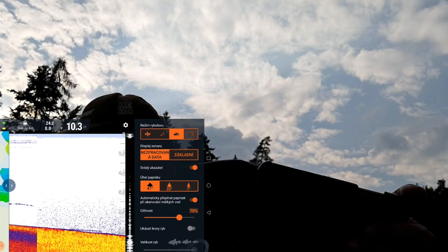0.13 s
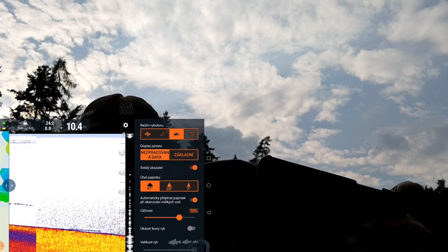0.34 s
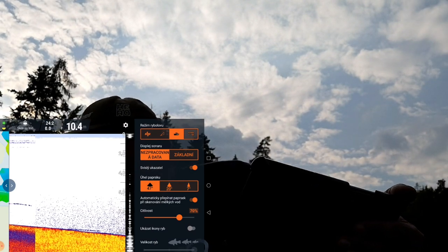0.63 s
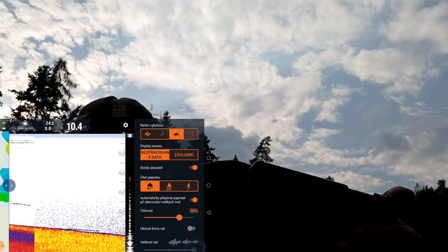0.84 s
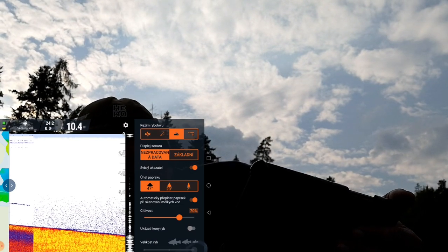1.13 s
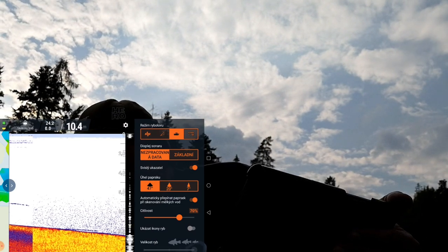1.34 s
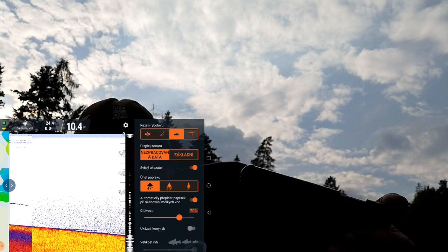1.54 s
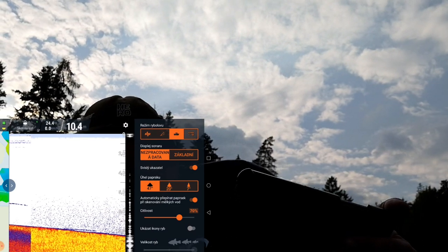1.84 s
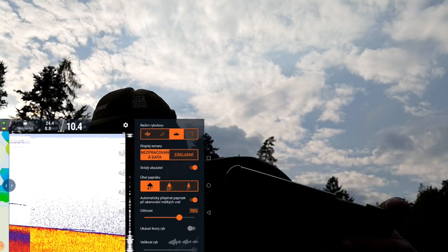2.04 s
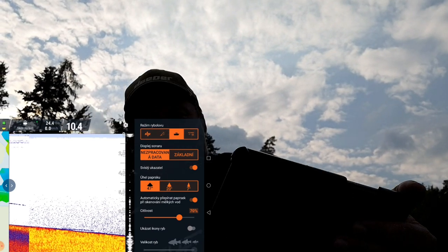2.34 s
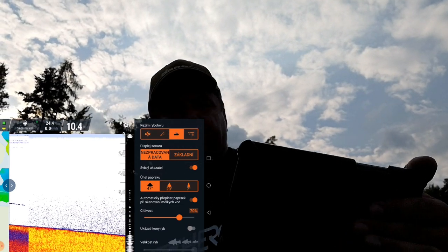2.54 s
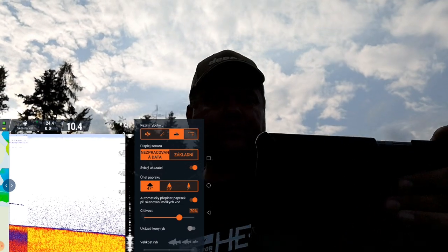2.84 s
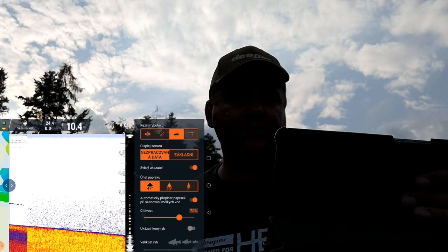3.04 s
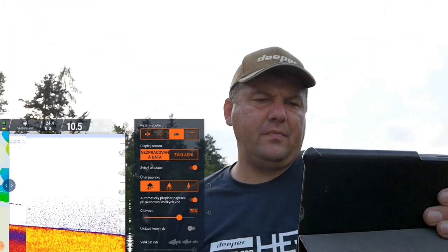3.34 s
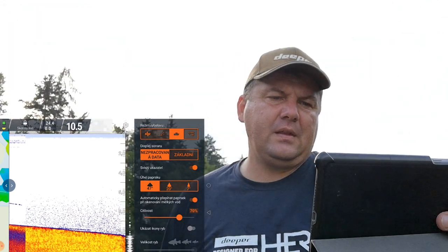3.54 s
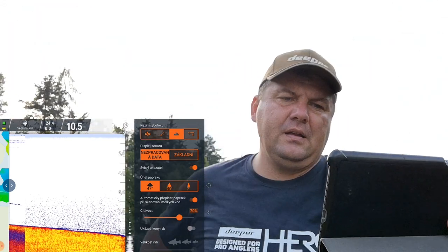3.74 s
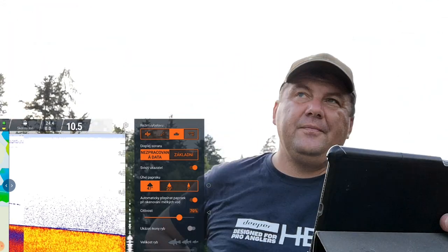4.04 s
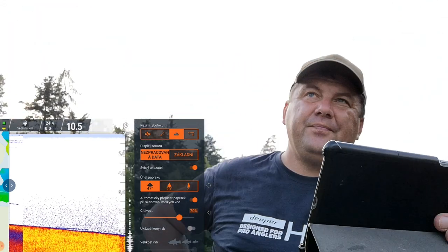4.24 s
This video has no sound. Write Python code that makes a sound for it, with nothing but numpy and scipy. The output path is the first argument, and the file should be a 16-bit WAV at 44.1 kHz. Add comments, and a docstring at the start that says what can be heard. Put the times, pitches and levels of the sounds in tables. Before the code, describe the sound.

Close by a small boat on a quiet lake, a wooden clonk strikes the water three times, about 0.7 seconds apart. Each gives a deep popping boom with a rising gulp, light splash, glugs and droplets. A loud hard knock on the deck follows, then a cluster of duller knocks and a short cloth rustle. Faint outdoor air; close stereo microphone on the boat.

```python
"""Three clonk strokes in a lake beside a boat

A wooden clonk is driven three times into the water: an air pocket booms as a falling sine, its neck pinches off
with a rising gulp, and left-over air glugs. Splashes, spray and plops are band noise; bubbles are gliding sines.
Noise through hull resonances surges after each stroke. Then knocks ring the deck and cloth rustles in the boat.
A two-port microphone sets the phase and level between left and right.
"""
import sys
import numpy as np
from scipy import signal
from scipy.fft import rfft, irfft, next_fast_len
from scipy.io import wavfile
from scipy.ndimage import uniform_filter1d

SR = 44100
rng = np.random.default_rng(int(sys.argv[2]) if len(sys.argv) > 2 else 0)


def master_out(mix):
    """Clip the mix to full scale and print it as 16-bit PCM to the path in sys.argv[1]."""
    frames = np.transpose(np.atleast_2d(mix))
    ceiling = np.clip(frames, -1, 1)
    pcm = np.round(ceiling * 32767).astype(np.int16)
    wavfile.write(sys.argv[1], SR, pcm)


N = 193863
T = np.arange(N) / SR
BANDS_HZ = 125 * 2 ** np.arange(0, 7, 1 / 3)  # third-octave centres
OPPOSITE = np.array([[1], [-1]])  # left up, right down

# timing of each stroke: blow_s, neck_closes_s, gulp_hz, gulp_length_s
STROKES = [(0.4156, .4460, 294, .027), (1.1164, 1.1545, 286.5, .033), (1.8277, 1.8645, 295, .025)]
# strength of each stroke: pocket_db, pocket_t60_s, neck_db, gulp_db, slap_db, slap_t60_s, spray_db, fall_back_db
STRENGTHS = [(-4, 0.71, -9, -7, -29, 0.18, -45.5, -50), (-3, 0.208, -16, -17, -28.5, 0.14, -46.5, -53.5),
             (-3, 0.3, -10, -11.5, -28, 0.1, -46, -48.5)]
EARLIER_STROKE_S = -.3  # its water is still settling
# knocks in the boat: start_s, level_db, tilt_db_per_octave, t60_s, thud_db, thud_hz, thud_width_octaves
KNOCKS = [(2.7200, -16, 0, 0.19, -43, 390, 0.13), (3.349, -29.5, -2, 0.13, -29, 260, 1),
          (3.454, -52, -9.5, 0.22, -46, 257, .5), (3.556, -24.5, -1.5, 0.12, -31.5, 373, .29),
          (3.6, -32.5, -1.5, 0.19, -30.5, 256, 0.93), (3.661, -29, -6.5, 0.082, -31.5, 630, 0.43),
          (3.664, -40, 0.5, 0.16, -41.5, 1450, 0.22), (3.694, -57.5, 7, 0.082, -58, 250, .56),
          (3.7760, -62.5, 11.5, 0.045, -63, 3600, .15), (3.798, -63, 4.5, 0.45, -68, 3750, 0.17)]


def undb(db):
    """Amplitude of a level in dB."""
    return 10 ** (np.asarray(db) / 20)


def unit(x):
    """Scale to an RMS of 1."""
    return x / np.sqrt(np.mean(x ** 2))


def band(x, hz, width):
    """Four-pole band-pass, width in Hz."""
    return signal.sosfilt(signal.butter(2, [hz - width / 2, hz + width / 2], "band", fs=SR, output="sos"), x)


def walk(rate):
    """Random levels, each held 1 / rate s, then smoothed into ramps."""
    hold = int(SR / rate)
    steps = np.repeat(rng.standard_normal(N // hold + 1), hold)
    return 0.47 * uniform_filter1d(steps, hold)[:N]


def shares(spectrum):
    """Power of each third-octave band, summing to 1, from a spectrum in dB per Hz."""
    hz, db = np.transpose(spectrum)
    density_db = np.interp(np.log(BANDS_HZ), np.log(hz), db, left=-90)
    power = undb(2 * density_db) * BANDS_HZ
    return power / power.sum()


def add(out, s, piece):
    """Mix a piece in at time s."""
    i = int(s * SR)
    out[..., i:i + piece.shape[-1]] += piece[..., :N - i]


def bubble(hz, length, start=0.81, glide_s=.005, skew=0.79):
    """A swelling and fading sine whose pitch slides from start * hz towards hz."""
    t = np.arange(int(length * SR)) / SR
    pitch = hz * (1 + (start - 1) * np.exp(-t / glide_s))
    swell = np.sin(np.pi * (t / length) ** skew)
    return swell * np.sin(2 * np.pi * np.cumsum(pitch) / SR)


def bursts(events, spectrum, damping):
    """Band power of broad noise bursts; t60 holds at 2 kHz and is shorter in the treble."""
    power, t = np.zeros((len(BANDS_HZ), N)), T[:SR // 2]
    octaves = np.log2(BANDS_HZ / 2000)[:, None]
    colour = shares(spectrum)[:, None]
    for s, db, tilt_db, t60, rise_s in events:
        fall = np.exp(-2 * np.log(1000) * t / (t60 * 2 ** (-damping * octaves)))
        rise = (1 - np.exp(-t / rise_s)) ** 2
        add(power, s, colour * undb(2 * (db + tilt_db * octaves)) * fall * rise)
    return power


def patches(events):
    """Band power of short noise patches, each a bell-shaped spectrum around its pitch."""
    power, t = np.zeros((len(BANDS_HZ), N)), T[:SR // 5]
    rise = (1 - np.exp(-t / .0018)) ** 2
    for s, db, hz, width, t60 in events:
        colour = np.exp(-(np.log2(BANDS_HZ / hz) / width) ** 2)
        colour = (colour / colour.sum())[:, None]
        add(power, s, colour * undb(2 * (db - 60 * t / t60)) * rise)
    return power


def hiss(power, alike, grain_db, grain_rate):
    """Band noise under power curves, with a grainy level; alike is the power share common to both ports."""
    out, grain = 0, undb(grain_db * walk(grain_rate))
    for hz, p in zip(BANDS_HZ, power):
        mid, side = unit(band(rng.standard_normal((2, N)), hz, hz / 4))
        pair = np.sqrt(alike) * mid + np.sqrt(1 - alike) * side * OPPOSITE
        out = out + np.sqrt(p) * pair
    return out * grain


def clonk():
    """The pocket rings from the blow; its neck throbs as it closes and the smaller bubble left behind gulps."""
    pocket_hz, neck_hz = 81.8, 177
    rebound_db, rebound_hz, rebound_s = -18, 70.5, .045
    out, t = np.zeros(N), T[:SR // 4]
    pitch = pocket_hz * (1 + 1.58 * np.exp(-t / 0.0032))  # falls onto the pocket's pitch
    tone = np.sin(2 * np.pi * np.cumsum(pitch) / SR)
    attack = 1 - np.exp(-(t / 0.0043) ** 2)
    for (s, pinch, gulp_hz, gulp_s), (db, t60, neck_db, gulp_db, *_) in zip(STROKES, STRENGTHS):
        closing = 1 / (1 + np.exp((t + s - pinch - .005) / .0025))  # fades the pocket as the neck shuts
        add(out, s, undb(db - 60 * t / t60) * attack * closing * tone)
        neck = bubble(neck_hz, .022, start=.75, glide_s=.004, skew=.75)
        add(out, pinch - .003, undb(neck_db) * neck)
        gulp = bubble(gulp_hz, gulp_s, start=.8, glide_s=.004, skew=.6)
        add(out, pinch + .002, undb(gulp_db) * gulp)
        # the pocket rebounds once as its neck closes
        add(out, pinch + .006, undb(rebound_db) * bubble(rebound_hz, rebound_s))
    return out


def smacks():
    """The blade smacks the surface: short steady sines just after each blow."""
    # start_after_blow_s, level_db relative to the slap, pitch_hz, length_s
    smack_table = [(.0024, 3, 2890, .0055), (.0028, -3.5, 3630, .006), (.003, -13, 1430, .01),
                   (.008, -1, 2830, .006)]
    out = np.zeros(N)
    for (s, *_), (_, _, _, _, slap_db, *_) in zip(STROKES, STRENGTHS):
        for late, db, hz, length in smack_table:
            add(out, s + late, undb(slap_db + db) * bubble(hz, length, start=1.0))
    return out


def glugs():
    """Air left under water glugs: low bubbles of 2.8 nominal cycles, rising in pitch."""
    # start_s, peak_db, pitch_hz
    glug_table = [(0.0, -29.5, 77.3), (0.519, -20, 91.6), (0.551, -19.5, 92.3), (.578, -20, 92.4),
                  (0.606, -26.5, 69), (0.705, -30.5, 71.5), (0.746, -40.5, 66.5), (1.214, -22, 87.5),
                  (1.264, -20.5, 92), (1.285, -27, 91.4), (1.313, -33.5, 77.8), (1.393, -34, 83),
                  (1.432, -40.5, 66), (1.934, -20.5, 97), (1.963, -20.5, 90.2), (2.022, -23.5, 75),
                  (2.066, -29, 81), (2.088, -32, 73.6), (2.115, -31.5, 66), (2.223, -43, 92)]
    out = np.zeros(N)
    for s, db, hz in glug_table:
        add(out, s, undb(db) * bubble(hz, 2.8 / hz))
    return out


def water():
    """Band power of each slap, the spray thrown as the neck closes, its fall back, lone splashes and plops."""
    # lone splashes: start_s, level_db, tilt_db_per_octave, t60_s
    splashes = [(.600, -42.5, -7, 0.12), (1.204, -57.5, 7, 0.15), (1.290, -60.5, 0.5, 0.27),
                (1.800, -45, -11, 0.076)]
    # plops of falling water: start_s, level_db, pitch_hz
    plops = [(0.109, -58.5, 693), (0.162, -52.5, 2400), (0.184, -54, 2830), (0.218, -57.5, 3120),
             (.520, -49.5, 1390), (.594, -47, 3420), (0.62, -46, 2050), (.652, -57, 1230),
             (0.747, -47.5, 3230), (0.759, -45.5, 2290), (.762, -58, 880), (0.822, -57, 2110),
             (0.861, -60, 1310), (.682, -58.5, 1950), (1.241, -54, 1370), (1.950, -60, 2000),
             (2.068, -57.5, 2730), (2.271, -55, 2130), (1.328, -56, 3300), (1.495, -53, 2720),
             (1.572, -61, 2250), (1.930, -50, 784), (2.005, -60, 3800), (2.048, -45, 916),
             (2.052, -51.5, 1730), (2.123, -59.5, 1450), (2.235, -56, 2800), (2.254, -48, 2020)]
    # thrown water falls back: after_neck_closes_s, relative_db, tilt_db_per_octave, t60_s, rise_s
    fall_back = [(.03, 0.5, -5.5, 0.72, 0.044), (0.044, -10.5, 3, 0.61, 0.077)]
    # colour shared by all slaps, then by all sprays: relative_db, pitch_hz, width_octaves, t60_s
    slap_colour = [(-2.5, 3700, .24, .06), (-13, 1520, .15, 0.24)]
    spray_colour = [(-0.2, 2030, .1, 0.13), (-1.9, 5700, .22, .11)]
    # spectrum of splashing water: frequency_hz, density_db_per_hz
    spray_spectrum = [(260, -42), (450, -12.5), (814, -19.5), (958, -10.5), (1110, -16), (1580, -11),
                      (1760, -9), (2260, -11), (2470, -13), (2820, -3), (4600, -19), (8200, -14),
                      (9230, -12.5), (15500, -54.5)]
    slap_tilt_db, slap_rise_s = -4.5, 0.0012
    spray_tilt_db, spray_t60_s, spray_rise_s = 5, 0.17, 0.022
    splash_rise_s, plop_width_oct, plop_t60_s = 0.011, .15, 0.084

    noisy = [(*row, splash_rise_s) for row in splashes]
    pitched = [(*row, plop_width_oct, plop_t60_s) for row in plops]
    for (s, pinch, *_), (*_, slap_db, slap_t60, spray_db, fall_db) in zip(STROKES, STRENGTHS):
        noisy.append((s + 0.0005, slap_db, slap_tilt_db, slap_t60, slap_rise_s))
        noisy.append((pinch, spray_db, spray_tilt_db, spray_t60_s, spray_rise_s))
        noisy += [(pinch + late, fall_db + db, *rest) for late, db, *rest in fall_back]
        pitched += [(s + .002, slap_db + db, *rest) for db, *rest in slap_colour]
        pitched += [(pinch + .011, spray_db + db, *rest) for db, *rest in spray_colour]
    return bursts(noisy, spray_spectrum, damping=0.089) + patches(pitched)


def gurgle():
    """Small rising bubbles crowd after each stroke and thin out."""
    out = np.zeros((2, N))
    for stroke in [EARLIER_STROKE_S] + [row[0] for row in STROKES]:
        for wait, height, loudness, side, cycles in rng.random((160, 5)):
            late = .04 - 0.089 * np.log(1 - wait)
            hz = 650 * 2 ** (2.9 * height)
            if stroke + late > 0:
                pan_db = 3 * (side - .5) * OPPOSITE
                level_db = -55 - 25 * late - 0.83 * np.log(1 - loudness) + pan_db
                drop = bubble(hz, (5 + 14 * cycles) / hz, start=0.69, glide_s=0.0082, skew=.5)
                add(out, stroke + late, undb(level_db) * drop)
    return out


def ticks():
    """Droplets tick on the water as tiny band-passed noise bursts; many fainter ones fall at random."""
    # start_s, level_db before make-up gain and pan, pitch_hz
    tick_table = [(0.1381, -53, 4750), (0.1527, -51, 5400), (0.172, -53, 6780), (0.2516, -56, 5430),
                  (0.348, -57.5, 5480), (0.61, -54.5, 9400), (0.6224, -51, 4580), (0.7506, -52, 7350),
                  (0.8994, -55, 5230), (0.9477, -54, 8530), (1.208, -54, 9000), (1.22, -44.5, 5140),
                  (1.2334, -54, 8500), (1.2999, -52.5, 4530), (1.3505, -55, 5530), (1.5227, -53.5, 4600),
                  (1.6492, -56.5, 5490), (1.7218, -52.5, 4980), (2.2127, -48.5, 7800), (2.236, -48, 4860),
                  (2.3413, -57, 9400), (2.376, -49.5, 6040)]
    dripping_s = 2.6  # faint drops fall until then
    out, t = np.zeros((2, N)), T[:SR // 30]
    faint = [(dripping_s * a, -67 - 2.0 * np.log(1 - b), 4500 * 2 ** (0.98 * c))
             for a, b, c in rng.random((400, 3))]
    for (s, db, hz), (length, side) in zip(list(tick_table) + faint, rng.random((450, 2))):
        envelope = np.exp(-t / (0.00079 + 0.0032 * length)) * (1 - np.exp(-t / 0.0018))
        burst = rng.standard_normal((2, len(t))) * envelope
        pan_db = 4 * (side - 1.0) * OPPOSITE  # leans to the right
        # adding the left burst to both makes the ports partly alike
        add(out, s, undb(db + 6.0 + pan_db) * band(burst + burst[0], hz, 0.5 * hz))
    return out


def boat():
    """Band power of the knocks with their thuds and of the cloth rustles with their creaks."""
    # rustles: start_s, level_db, tilt_db_per_octave, t60_s
    rustle_table = [(4.214, -51, -3.5, 0.36), (4.234, -49.5, -2, 0.67), (4.258, -34.5, -1.5, 0.1),
                    (4.291, -39.5, -5, 0.23), (4.314, -36, -3.5, 0.13), (4.3860, -46.5, 3, 0.099)]
    # spectra of knocks and of cloth: frequency_hz, density_db_per_hz
    knock_spectrum = [(71, -43), (120, -20.5), (288, -17), (390, -12.5), (676, -10), (1100, -3.5),
                      (1240, -3), (1620, 0), (2030, 1), (2700, 0), (3110, -10), (9320, -20.5), (15500, -90)]
    cloth_spectrum = [(71, -31), (120, -6), (312, -8.5), (353, -9), (407, -10.5), (1100, -19), (2440, -2),
                      (3300, -3.5), (9320, -0.5), (15500, -32)]
    knock_rise_s, thud_t60_s, rustle_rise_s = 0.0011, .2, 0.011
    creak_db, creak_hz, creak_width_oct, creak_t60_s = -3, 2250, 0.15, 0.081  # level relative to the rustle

    knocks = bursts([(*row[:4], knock_rise_s) for row in KNOCKS], knock_spectrum, damping=0.55)
    rustles = bursts([(*row, rustle_rise_s) for row in rustle_table], cloth_spectrum, damping=0.18)
    thuds = [(s, db, hz, width, thud_t60_s) for s, _, _, _, db, hz, width in KNOCKS]
    creaks = [(s, db + creak_db, creak_hz, creak_width_oct, creak_t60_s) for s, db, *_ in rustle_table]
    return knocks + rustles + patches(thuds + creaks)


def deck():
    """Each knock also rings the deck boards: decaying sines, slightly varied in pitch and level."""
    # board modes: pitch_hz, level_db, longest_t60_s
    modes = [(1165, -6.5, 0.23), (1370, -29.5, 0.18), (1685, -13.5, 0.24), (1890, 0, 0.27),
             (2035, -2, 0.37), (2020, -12, 0.049), (2450, -9, 0.25), (2560, 10.5, 0.073), (2890, 2, 0.091),
             (3610, 10, 0.049)]
    out, t = np.zeros(N), T[:SR // 4]
    chances = rng.standard_normal((len(KNOCKS), len(modes)))
    for (s, db, tilt_db, t60, *_), chance in zip(KNOCKS, chances):
        for (hz, mode_db, mode_t60), c in zip(modes, chance):
            level_db = db - 16 + mode_db + tilt_db * np.log2(hz / 2000) + 0.6 * c
            tone = np.sin(2 * np.pi * hz * (1 + 0.01 * c) * t)
            add(out, s, undb(level_db - 60 * t / min(mode_t60, t60)) * tone)
    return out


def hull_knocks():
    """The hull booms: low swelling sines rising to pitch."""
    # start_s, peak_db, pitch_hz, length_s
    boom_table = [(3.369, -31, 112, 0.031), (3.569, -27, 112.3, 0.1)]
    out = np.zeros(N)
    for s, db, hz, length in boom_table:
        add(out, s, undb(db) * bubble(hz, length))
    return out


def resonate(modes):
    """Noise through a set of band-passes, summed and scaled to an RMS of 1."""
    return unit(sum(undb(db) * unit(band(rng.standard_normal(N), hz, width)) for hz, width, db in modes))


def wash():
    """Water on the hull keeps its low resonances going, surging after each stroke; gulps kick the upper ring."""
    # low, then upper hull resonances: pitch_hz, width_hz, level_db
    boom_modes = [(39.6, 21, -1), (63.2, 33.5, -3), (89.7, 27, -1.5), (119, 36, -9)]
    ring_modes = [(167, 87, 1.5), (234.9, 46, 3.5), (291, 112, 0)]
    # level of the upper ring apart from surges and kicks: time_s, level_db
    calm_ring = [(0, -66.5), (1.6, -75.5), (2.4, -67.5), (3.2, -63), (3.7, -54), (3.9, -62.5), (4.4, -59.5)]
    calm_boom_db, surge_db, surge_rise_s, surge_t60_s = -53.5, -19.5, .1, 0.65
    surge_ring_db = -20  # the ring's surge relative to the boom's

    boom, ring = resonate(boom_modes), resonate(ring_modes)
    kick, t = np.zeros(N), T[:SR // 2]
    for (_, pinch, _, gulp_s), (_, _, _, gulp_db, *_) in zip(STROKES, STRENGTHS):
        add(kick, pinch + gulp_s, undb(gulp_db - 24.5 - 60 * t / 0.45) * (1 - np.exp(-t / 0.0025)))
    surge = 0
    for stroke in [EARLIER_STROKE_S] + [row[0] for row in STROKES]:
        since = np.maximum(T - stroke, 0)
        rise = 1 - np.exp(-(since / surge_rise_s) ** 2)
        surge = surge + undb(surge_db - 60 * since / surge_t60_s) * rise
    boom_level = undb(calm_boom_db) + surge
    ring_level = undb(np.interp(T, *np.transpose(calm_ring))) + undb(surge_ring_db) * surge + kick
    return boom_level * boom + ring_level * ring


def air():
    """Steady background air: shaped noise with a slowly wavering level."""
    # frequency_hz, density_db_per_hz
    air_spectrum = [(210, -32.5), (350, -4), (546, -14.5), (591, -15.5), (660, -12), (1110, -12),
                    (1210, -14.5), (1440, -8), (3440, -15), (9180, -26.5), (15500, -31.5)]
    air_db = -66.5
    return hiss(shares(air_spectrum) * undb(2 * air_db), alike=0.47, grain_db=1.1, grain_rate=11)


def scene():
    """Mix the strokes, the water, the boat and the air."""
    strokes = clonk() + smacks() + glugs()
    splash = hiss(water(), alike=0.58, grain_db=7.0, grain_rate=110)
    handling = hiss(boat(), alike=0.75, grain_db=2.0, grain_rate=180)
    hull = hull_knocks() + wash()
    return strokes + splash + gurgle() + ticks() + handling + deck() + hull + air()


def record(dry):
    """The two ports hear each pitch shifted in phase against each other and colour the treble; the top is cut."""
    # phase between the ports: frequency_hz, left_lead_radians
    ports = [(0, 0), (85, .3), (180, .7), (300, .76), (690, 2.6), (1400, 1.8), (2840, 2.2), (15500, 33)]
    # resonances of the microphone ports: pitch_hz, width_hz, level_db
    capsule = [(5730, 550, 4), (9270, 780, 5)]
    # level between the ports: frequency_hz, left_louder_db
    left_louder = [(300, 0), (700, 4), (1400, -1), (6000, 0), (10000, 3.5), (15000, 1.5)]
    self_noise_db, top_hz = -96.0, 15750

    size = next_fast_len(N + 4096)
    hz = np.arange(size // 2 + 1) * SR / size
    # each port takes half the difference
    turn = np.exp(.5j * np.interp(hz, *np.transpose(ports)) * OPPOSITE)
    tilt_db = np.interp(hz, *np.transpose(left_louder)) / 2 * OPPOSITE
    colour_db = sum(db * np.exp(-((hz - f) / width) ** 2) for f, width, db in capsule)
    wet = irfft(rfft(dry, size) * turn * undb(colour_db + tilt_db), size)[:, :N]
    wet = wet + undb(self_noise_db) * rng.standard_normal(wet.shape)
    return signal.sosfilt(signal.ellip(8, .2, 70, top_hz, fs=SR, output="sos"), wet)


dry = scene()
out = record(dry)
master_out(out)
```